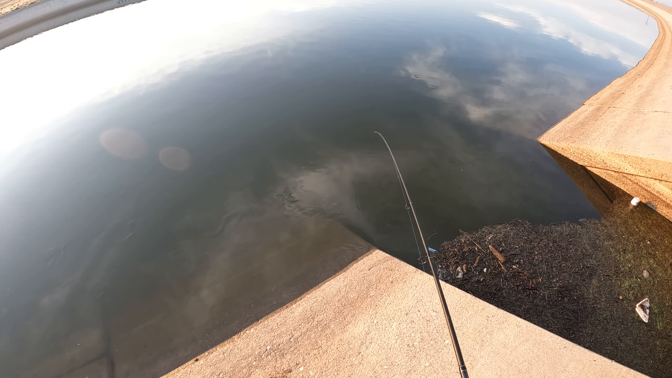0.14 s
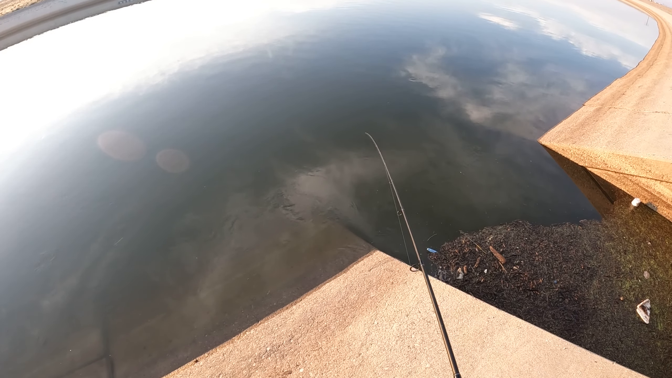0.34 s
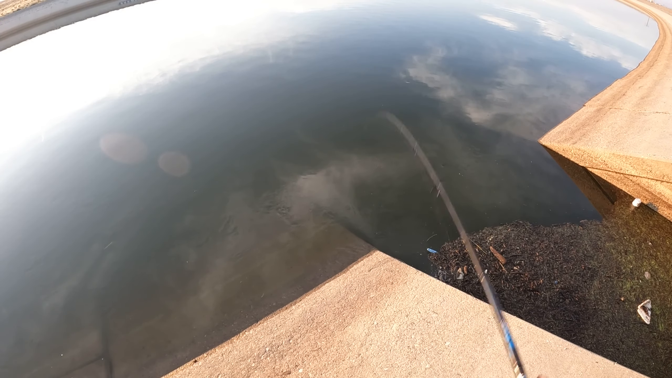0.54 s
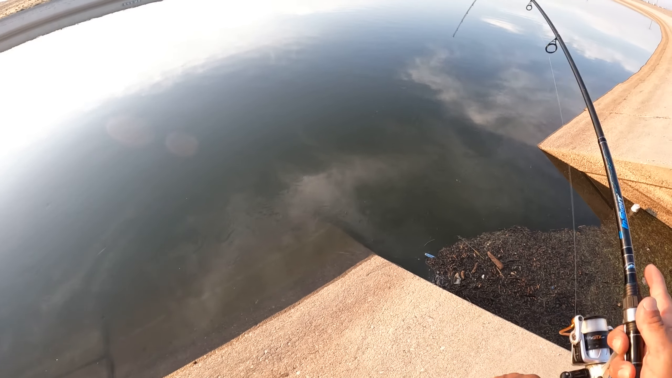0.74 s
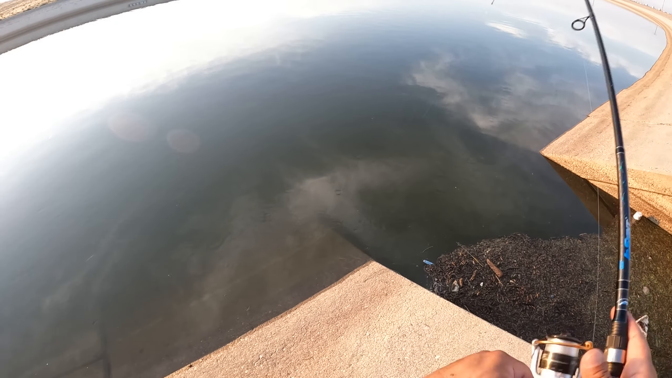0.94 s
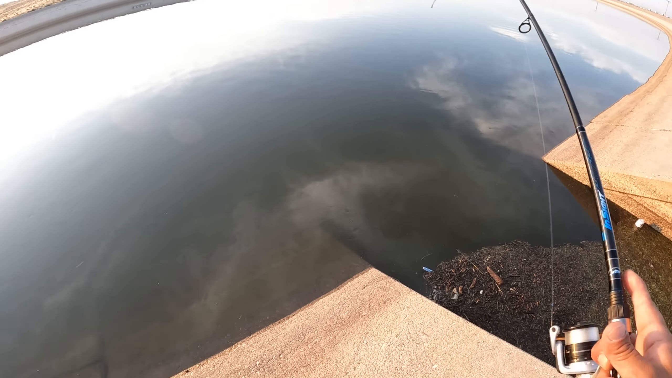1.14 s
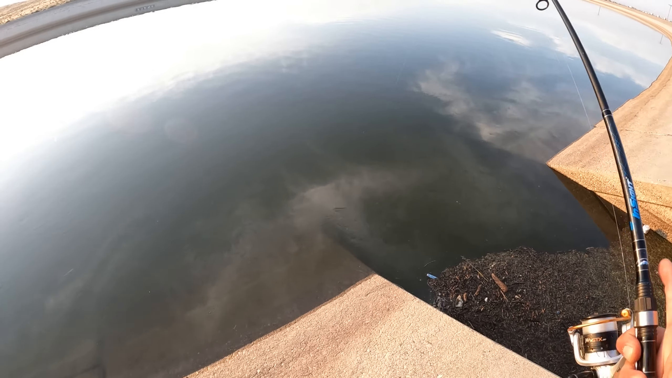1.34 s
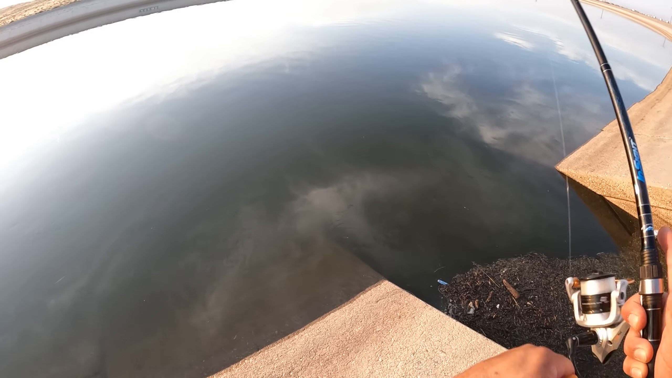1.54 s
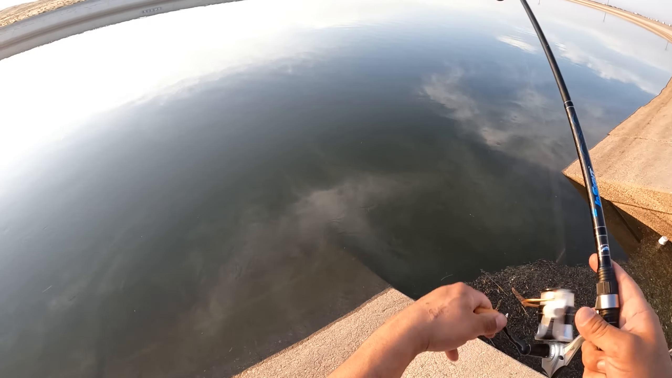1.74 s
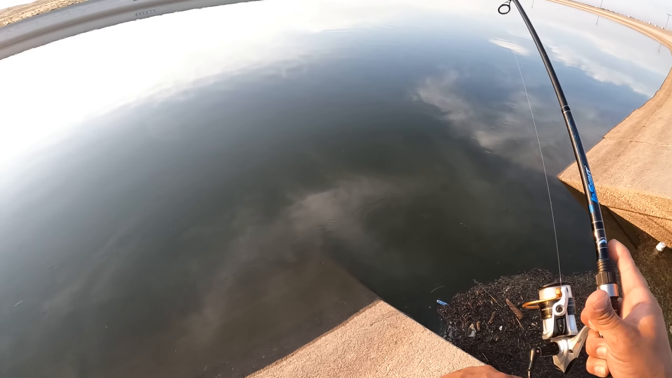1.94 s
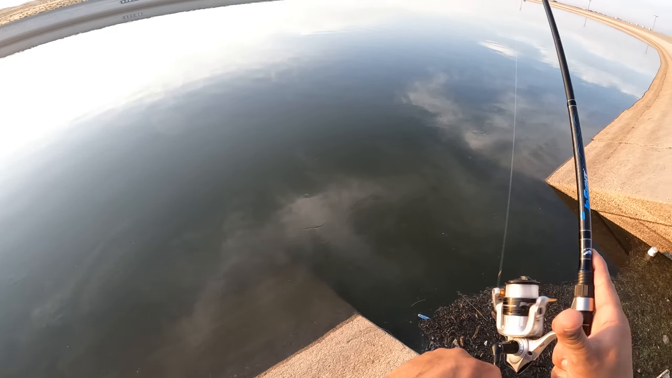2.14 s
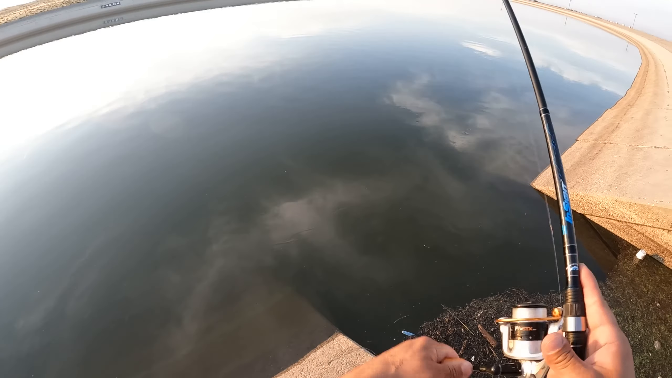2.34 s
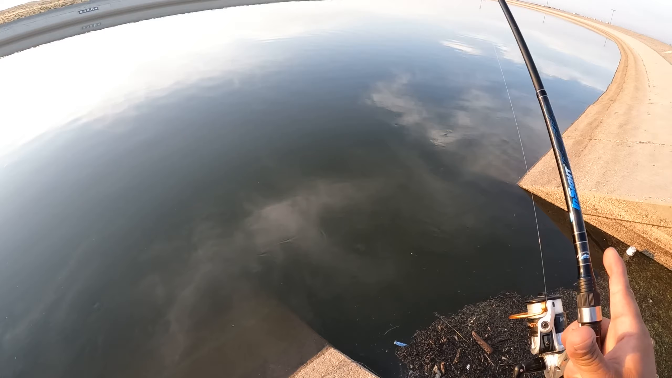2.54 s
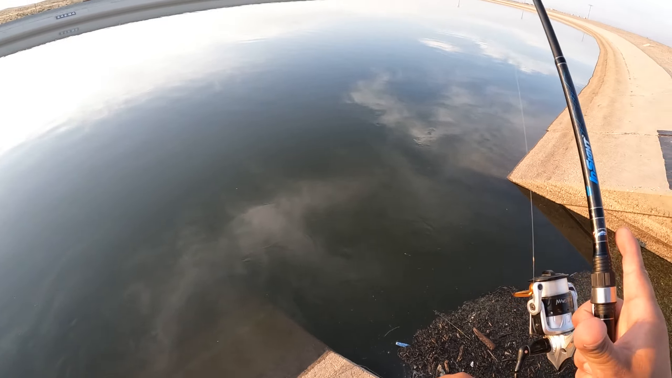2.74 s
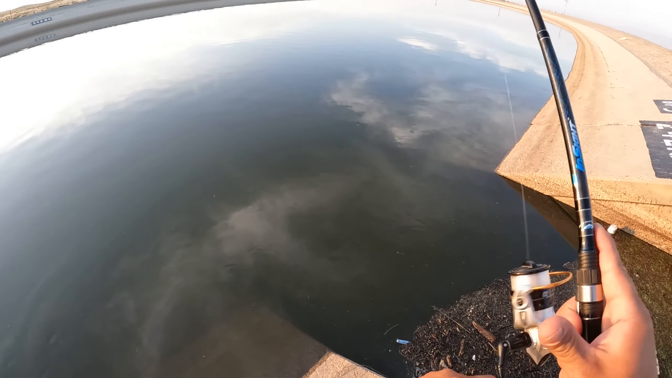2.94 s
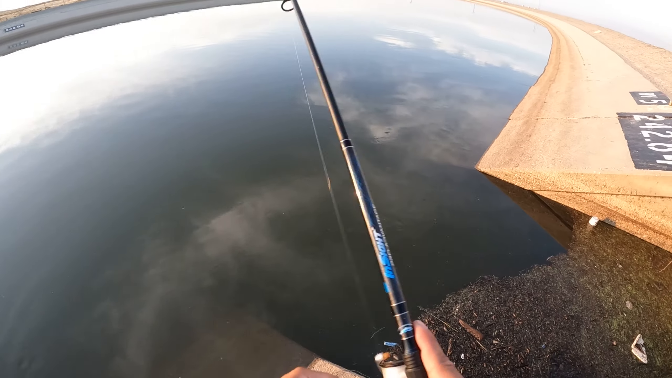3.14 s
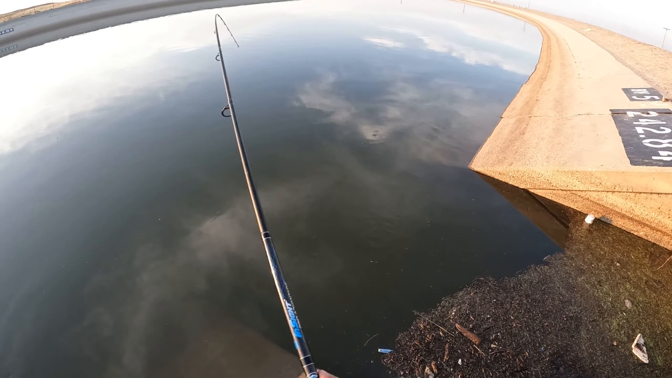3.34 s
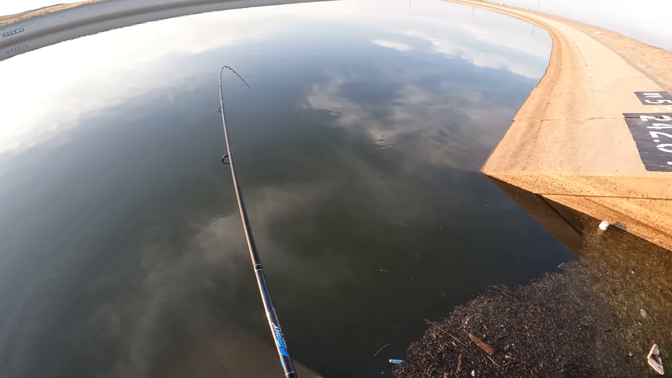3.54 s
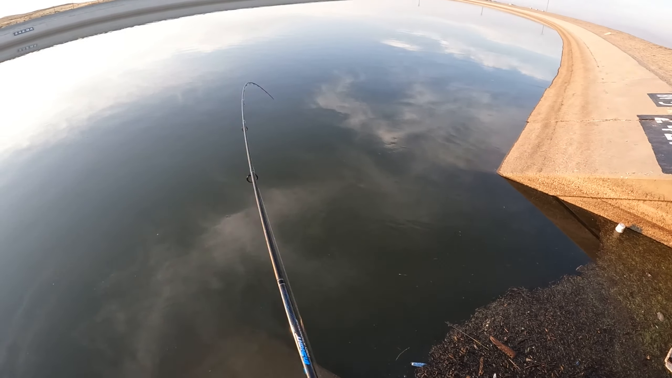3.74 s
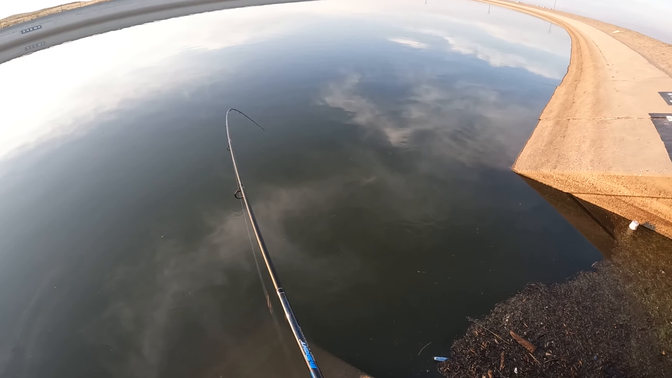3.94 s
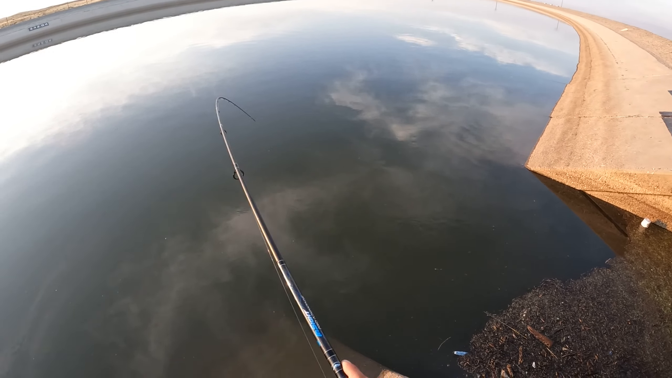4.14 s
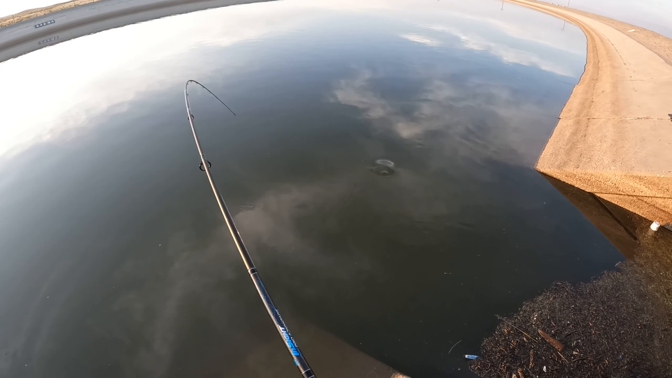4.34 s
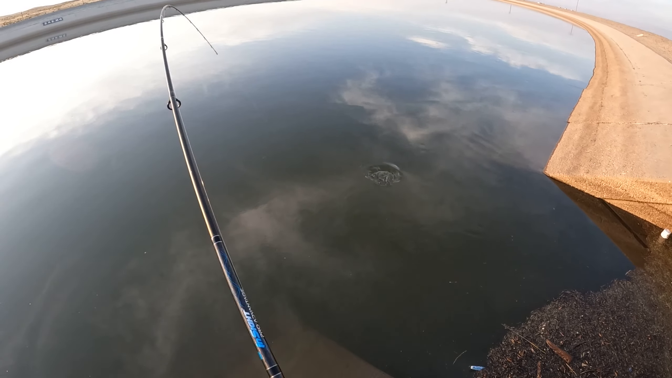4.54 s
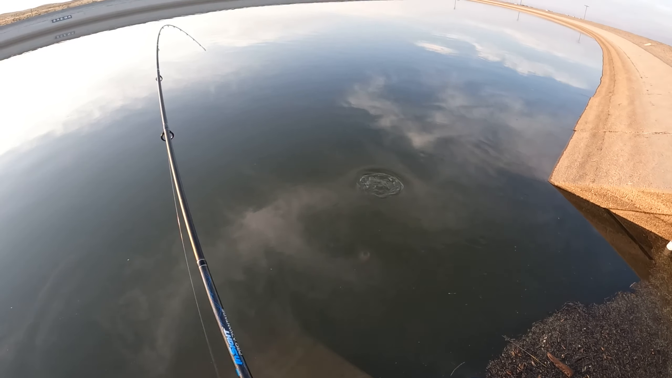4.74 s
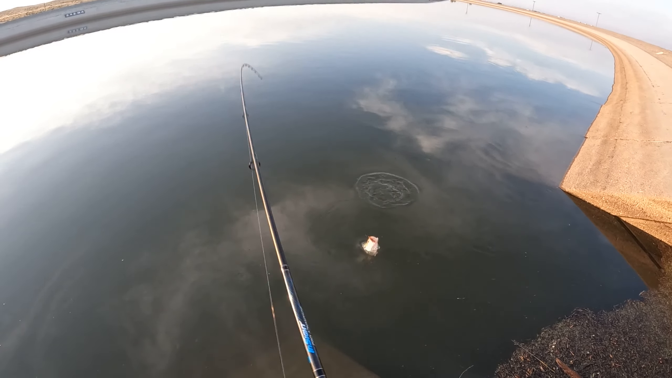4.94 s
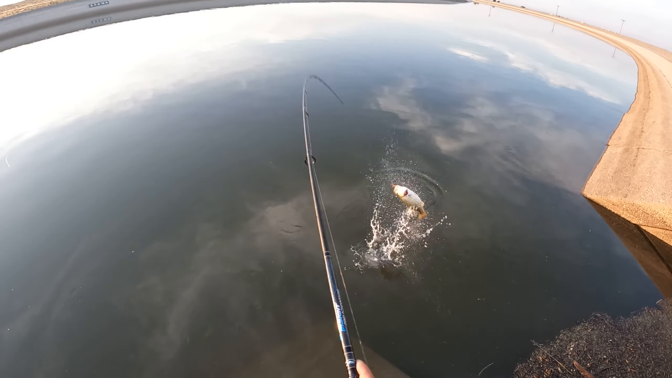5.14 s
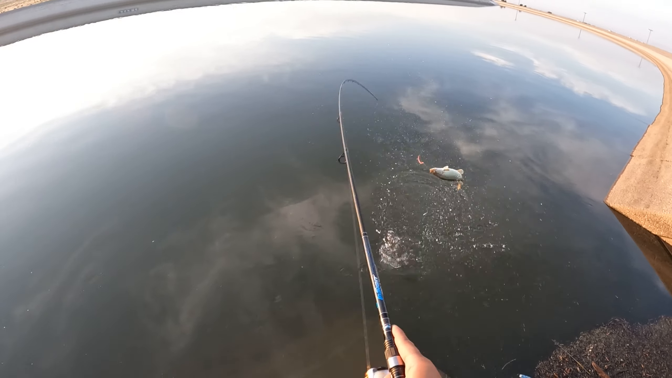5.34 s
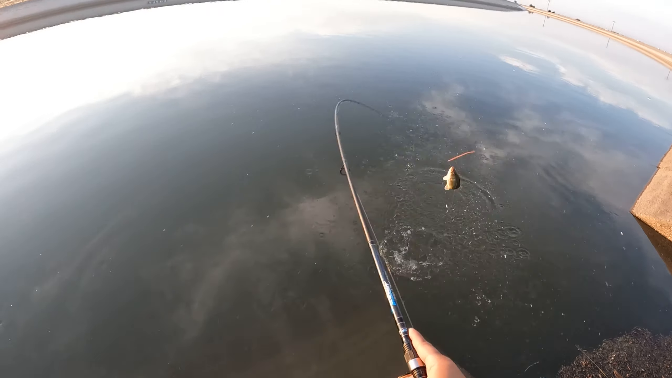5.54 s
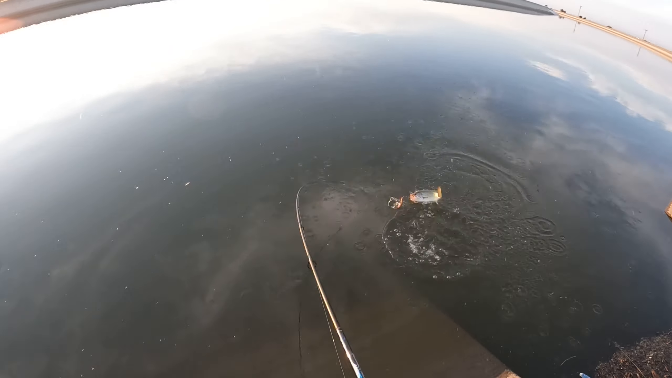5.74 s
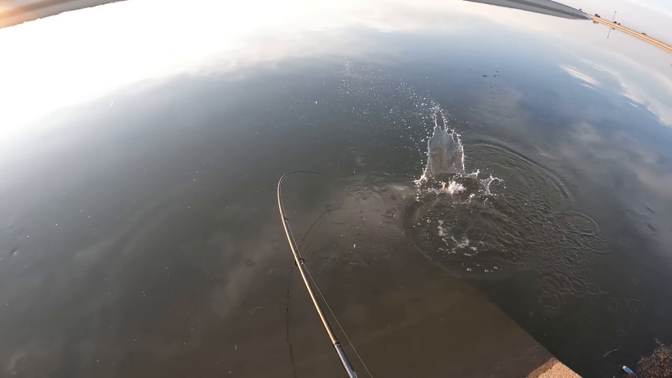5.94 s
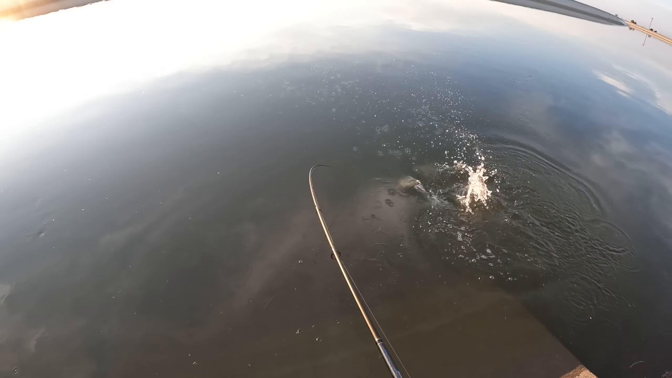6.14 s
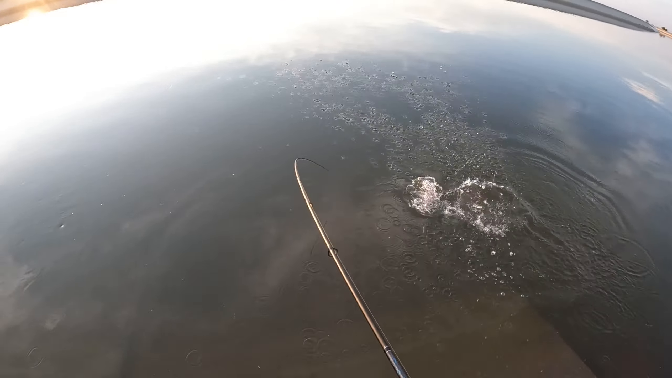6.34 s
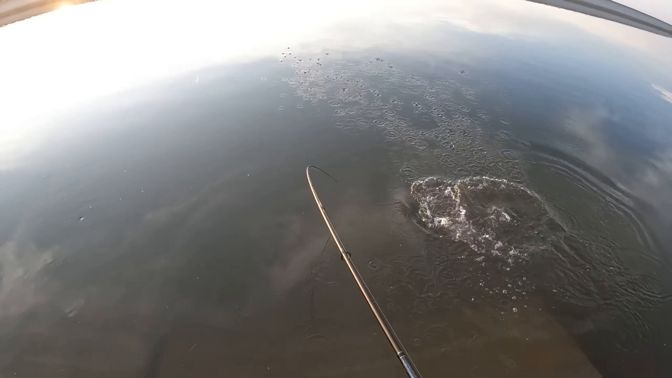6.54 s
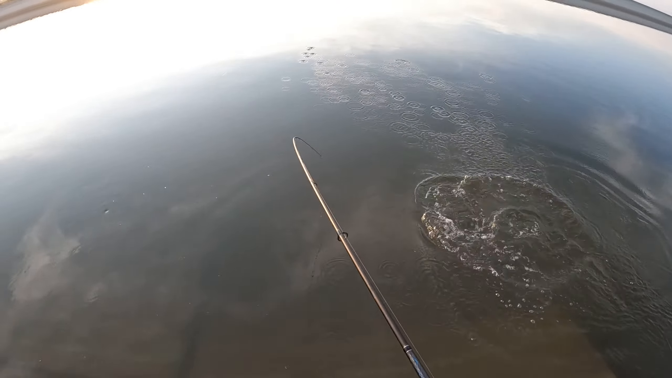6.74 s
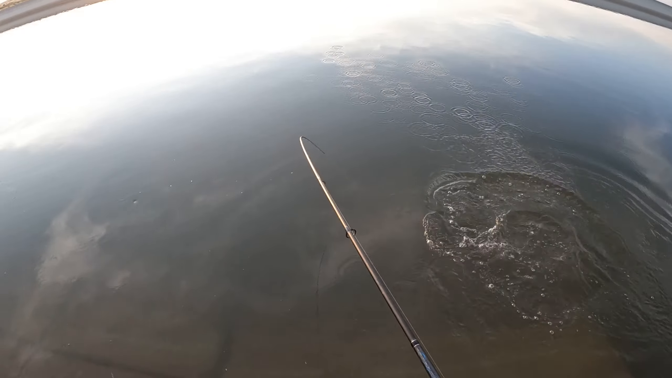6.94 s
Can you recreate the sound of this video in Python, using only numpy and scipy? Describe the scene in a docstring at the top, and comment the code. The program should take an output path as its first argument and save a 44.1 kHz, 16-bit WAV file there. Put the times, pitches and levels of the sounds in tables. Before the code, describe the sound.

Close reel clicking races and coasts in spurts over low wind rumble, followed by heavy watery thrashing, pattering spray and bubbling gulps.

```python
"""Wind rumbles on a body-worn microphone and sleeves rustle; then line rasps in the rod rings on a concrete bank.
A hooked fish pulls line in spurts: the reel's drag clicker ticks once per tooth as the spool speeds up and coasts.
Tackle clacks as modes ring, hands bump in soft noise bursts, and the taut line squeaks in gliding partials.
Then the fish leaps, falls back and thrashes: bubbles churn, spray patters, slaps burst, drops ring and air gulps."""
import sys
import numpy as np
from scipy import signal
from scipy.fft import rfft, irfft
from scipy.io import wavfile
from scipy.ndimage import uniform_filter1d, map_coordinates

SR = 44100
rng = np.random.default_rng(int(sys.argv[2]) if len(sys.argv) > 2 else 0)


def wav_out(sig):
    """Save sig, one row per channel (or a flat mono array), as 16-bit PCM at SR to the path in sys.argv[1]."""
    wavfile.write(sys.argv[1], SR, np.round(np.clip(np.atleast_2d(sig).T, -1, 1) * 32767).astype(np.int16))


N = 308259
T = np.arange(N) / SR  # seconds

# All table levels are relative: each source is balanced by its own function.
# Scatter around the microphone ports. Each row: frequency in Hz, level in dB.
SCATTER_COLOUR = [(100, -29), (500, -16.5), (1000, -12), (2000, -4), (4000, -4.5), (9000, -26),
                  (13000, -2.5)]
# Course of the wind on the microphone. Each row: time in seconds, level in dB.
WIND_LEVEL = [(0.0, -48.5), (0.47, -53), (0.72, -38), (0.99, -57.5), (1.13, -43), (1.38, -47.5),
              (1.75, -39.5), (2.12, -41), (2.45, -42), (2.51, -49), (2.9, -45), (4.63, -45.5), (4.71, -53),
              (5.35, -40), (5.65, -52), (5.68, -41.5), (6.97, -53.5), (6.99, -51)]
# Spectrum of the wind. Each row: frequency in Hz, level in dB.
WIND_COLOUR = [(15, -1), (28, -1), (42, -7), (58, -13), (85, -18), (120, -22), (180, -31)]
# Course of the dull low rustle: sleeves and grip, then water sloshing from 5.2 to 6.7 s. Each row: time in
# seconds, level in dB.
GRIP_LEVEL = [(0.0, -60.5), (1.79, -51), (2.8, -61.5), (3.21, -50.5), (5.0, -52.5), (5.3, -36), (5.88, -53),
              (6.07, -52), (6.35, -47), (6.99, -55)]
# Spectrum of that rustle. Each row: frequency in Hz, level in dB.
GRIP_COLOUR = [(60, -15.5), (120, -14), (220, 1.5), (320, 1), (480, -15.5), (900, -23.5)]
# Spectrum of the far hum of open country. Each row: frequency in Hz, level in dB.
AIR_COLOUR = [(100, -10.5), (200, 4), (330, -21.5), (500, -20.5), (800, -26.5), (1500, -23), (4000, -76),
              (10000, -39), (15000, -48)]
# Sweeps of the rod drag line through the rings.
# Each row: time of the height in seconds, level in dB, rise in seconds, fall in seconds.
ROD_SWEEPS = [(0.23, -52.5, 0.26, 0.28), (0.67, -39, .15, .4), (1.46, -51.5, 0.41, 0.18),
              (2.02, -38, 0.45, 0.17), (2.79, -47, 0.6, 0.42), (3.45, -37, 0.18, 0.53),
              (4.88, -41, 0.14, 1), (5.28, -33, 0.49, 0.26), (5.93, -49, .08, .4),
              (6.53, -33.5, 0.62, 0.35)]
# Spectrum of the line's rasp. Each row: frequency in Hz, level in dB.
LINE_COLOUR = [(700, -22.5), (1200, -7), (1600, 1), (2000, 6.5), (2350, 2.5), (2800, -7.5), (3500, -3),
               (4300, -11), (5200, -7.5), (7000, -15), (11000, -23), (15000, -40)]
# Hard clacks of rod and reel. Each row: start in seconds, strength in dB.
CLACKS = [(0.6024, -24.5), (0.6465, -18), (0.6497, -13), (0.9533, -29), (1.48, -28.5)]
# Ringing modes of a clack. Each row: frequency in Hz, level in dB, time to fall 60 dB in seconds.
CLACK_MODES = [(1250, -3, 0.0035), (1810, 2, 0.021), (1950, 4, 0.013), (2350, 5, 0.0085),
               (3110, -18, 0.044), (4500, 1.5, 0.0033)]
# Hands bump and rub the tackle. Each row: start in seconds, strength in dB.
HAND_BUMPS = [(0.648, -40.5), (1.528, -47), (1.768, -40.5), (2.052, -35.5), (2.08, -34.5), (2.218, -44.5),
              (2.944, -43), (3.331, -38), (4.04, -41.5), (4.457, -33), (4.54, -39), (4.994, -40),
              (5.434, -41), (5.674, -34), (5.894, -34.5), (5.959, -38)]
# Spectrum of a bump. Each row: frequency in Hz, level in dB.
BUMP_COLOUR = [(60, -11), (130, -2), (210, 1.5), (330, -9.5), (650, -15.5), (1200, -18.5), (3000, -19)]
# Each tug of the fish spins the spool up and lets it coast.
# Each row: time of top speed in seconds, top speed in ticks per second, spin-up in seconds,
# coast in seconds, tick strength in dB, buzz of the bent rod in dB, ring of the spool in dB.
TUGS = [(0.756, 125, .0415, .15, -37.5, -18, -4), (1.085, 270, 0.054, 0.069, -38.5, 0, -2.5),
        (1.214, 320, 0.063, 0.15, -37, -13, -6.5), (1.63, 128, 0.059, 0.089, -39.5, 0, -1.5),
        (1.787, 220, .075, 0.08, -38.5, -1, -1.5), (1.93, 240, 0.059, 0.065, -36.5, 12, -4.5),
        (2.305, 180, 0.082, .13, -39, -2, -1), (2.53, 260, .1, .075, -39, 4, -3.5),
        (3.12, 141, 0.11, 0.13, -37, -7, 2.5), (3.235, 176, 0.13, .1, -36, -12, -4),
        (3.335, 288, 0.1, .08, -36, 5, -7.5), (3.595, 235, 0.075, 0.19, -38.5, 8.5, -2.5),
        (3.82, 440, 0.084, 0.24, -40.5, 14.5, -2.5), (3.968, 393, .08, .08, -39.5, 12, -3.5),
        (4.12, 620, 0.074, .13, -39, 9.5, -5), (4.26, 178, .06, .055, -38, -3, -7.5),
        (4.44, 94, 0.13, 0.1, -38.5, 0, -3), (4.57, 181, 0.058, .115, -37, 3, -5.5),
        (5.269, 125, 0.12, 0.25, -46.5, -2, -1), (5.579, 430, .055, 0.18, -39, 13.5, -6.5),
        (5.998, 80, .04, 0.15, -47.5, -2, 2), (6.38, 400, 0.17, 0.21, -44.5, -3, -5),
        (6.7, 225, .11, 0.091, -44.5, 19, -0.5)]
# The spool slips by a single tooth. Each row: start in seconds, strength in dB.
SINGLE_TICKS = [(0.9328, -21.5), (1.0121, -22), (1.378, -26), (1.4815, -28.5), (1.5424, -28), (2.0173, -20),
                (2.0358, -22.5), (2.1458, -23), (2.2052, -25.5), (2.6105, -26.5), (2.7901, -28),
                (2.8564, -25.5), (2.9058, -25), (2.9711, -25.5), (3.441, -26.5), (3.493, -25.5),
                (4.778, -25.5), (4.91, -24), (4.978, -23), (5.0025, -23), (5.027, -21), (5.7952, -31.5),
                (5.818, -28), (5.858, -27), (6.8044, -30), (6.8448, -26.5)]
# The pawl bounces after each drop. Each row: nominal delay in seconds, share of the drop (signed).
PAWL_BOUNCES = [(.00025, -.9), (.0006, .5), (.0011, -.3)]
# Short, damped knock of the reel body. Each row: frequency in Hz, bandwidth in Hz, mean level in dB.
REEL_BODY = [(1150, 230, -7.5), (1790, 73, 3), (2920, 370, -2), (3543, 120, 5.5), (4234, 540, 2),
             (5200, 1290, 1.5), (6370, 2540, 2), (8000, 780, 3.5), (8530, 1230, -3), (10420, 390, -2),
             (11170, 320, -4), (13300, 2400, -13.5), (13900, 700, -28)]
# The metal spool rings on.
# Each row: nominal frequency in Hz, mean level in dB, time to fall 60 dB in seconds.
SPOOL_MODES = [(5253, 0.5, 0.1), (5353, 2, 0.04), (7450, -7, 0.15), (9800, -12, 0.059), (11050, -13, 0.14)]
# The taut line squeaks in the rings.
# Each row: start in seconds, length in seconds, first pitch in Hz, last pitch in Hz, level in dB.
SQUEAKS = [(1.697, 0.095, 1950, 2027, -41), (1.971, 0.099, 2295, 2050, -45), (2.05, 0.045, 2400, 3680, -58),
           (2.539, 0.1, 1950, 2130, -38), (2.60, 0.12, 2080, 1570, -45), (2.704, 0.13, 1600, 1655, -46.5),
           (2.74, 0.081, 2000, 2024, -42.5), (2.945, 0.047, 1680, 1544, -50)]
# Partials of a squeak. Each row: multiple of the pitch, level in dB.
SQUEAK_PARTIALS = [(1, 3.5), (2, -9), (3, -28)]
# The fish throws up water. Each row: time of the height in seconds, churn in dB, build-up in seconds,
# settling in seconds, spray at once in dB, spray falling back in dB.
SPLASHES = [(5.162, -25, 0.042, .16, -29.5, -30), (5.28, -38.5, 0.14, 0.34, -38, -37.5),
            (5.703, -32, 0.0068, 0.015, -42, -68), (5.875, -37, 0.0073, 0.055, -24.5, -38),
            (6.05, -23, 0.051, 0.076, -31, -36.5), (6.185, -34, 0.066, .1, -34, -54),
            (6.33, -23.5, 0.15, 0.27, -30, -32), (6.6, -35.5, 0.083, .16, -35.5, -62),
            (6.954, -48, 0.0073, 0.12, -56, -55)]
# Spectrum of the churning water. Each row: frequency in Hz, level in dB.
CHURN_COLOUR = [(150, -0.5), (230, 1), (330, 3), (550, 5), (780, -3), (1050, 9), (1400, -0.5),
                (2000, -24.5)]
# Spectrum of spray and of a drop's tick. Each row: frequency in Hz, level in dB.
SPRAY_COLOUR = [(900, -5), (1200, -4), (2200, -3.5), (3000, -8.5), (4500, -8), (7000, -14), (9000, -23),
                (12000, -21.5), (15000, -40)]
# Body and tail slap the surface. Each row: start in seconds, strength in dB, decay constant in seconds.
SLAPS = [(5.16, -3, 0.0072), (5.173, -12.5, 0.02), (5.343, -24, 0.0064), (5.699, -20.5, 0.0023),
         (5.873, -20.5, 0.017), (6.044, -6.5, 0.0086), (6.05, -10, 0.011), (6.295, -9.5, .01),
         (6.319, -13, .013), (6.337, -11, 0.014)]
# Spectrum of a slap. Each row: frequency in Hz, level in dB.
SLAP_COLOUR = [(150, -18), (330, -0.5), (700, 5), (1200, 9), (2000, -4), (4000, -13), (8000, -40),
               (15000, -54)]
# Single drops land and ring. Each row: start in seconds, strength in dB, starting pitch in Hz.
DROPS = [(5.265, -21.5, 1250), (5.289, -22, 1340), (5.339, -15.5, 2220), (5.383, -19, 1860),
         (5.303, -26, 2300), (5.4174, -24.5, 2640), (5.4636, -21, 1850), (5.9238, -19.5, 1760),
         (6.0728, -18, 1055), (6.0993, -22.5, 1730), (6.1559, -24.5, 995), (6.176, -23.5, 1220),
         (6.2347, -18, 1784), (6.383, -22, 1740), (6.455, -23, 1774), (6.4914, -23, 1850),
         (6.765, -28, 1860), (6.8257, -31, 1810), (6.951, -31, 1190)]
# Air pockets gulp. Each row: start in seconds, first pitch in Hz, pitch approached at the end in Hz,
# peak level in dB, time scale in seconds (the peak comes after a quarter of it).
GULPS = [(5.293, 326, 200, -42, 0.025), (5.626, 600, 278, -36.5, 0.0081), (5.699, 1150, 315, -28, 0.0137),
         (5.862, 450, 290, -27.5, 0.011), (5.92, 234, 321, -33, 0.13), (5.984, 950, 826, -29.5, 0.024),
         (6.024, 390, 524, -25.5, 0.017), (6.05, 360, 303, -15, 0.0067), (6.082, 250, 286, -36.5, 0.075),
         (6.271, 690, 580, -27, 0.018), (6.297, 296, 397, -29, 0.02)]

STALL_TICKS_PER_S = 58  # below this speed the drag holds the spool
HELD_BUZZ_DB, HELD_RING_DB = -15, -3.5  # rod buzz and spool ring while the spool is held


def from_db(db):
    """Turn decibels into an amplitude factor."""
    return 10 ** (np.asarray(db) / 20)


def rms_one(x):
    """Scale a sound to an rms of 1."""
    return x / np.sqrt(np.mean(x ** 2) + 1e-20)


def level_course(rows):
    """Join rows of (seconds, dB) by straight lines, at every sample."""
    seconds, db = np.transpose(rows)
    return np.interp(T, seconds, db)


def drift(rate):
    """Random wander with a spread of about 1, taking `rate` new values per second."""
    knots = rng.standard_normal(8000)
    return np.interp(T * rate, np.arange(len(knots)), knots) / np.sqrt(2 / 3)


def colour(x, points):
    """Causal (minimum-phase) filter with the given spectrum and unit power gain."""
    size = 4096
    hz, db = np.transpose(points)
    f = np.maximum(np.arange(size // 2 + 1) * SR / size, 5)
    # beyond the outer points the level falls 20 dB per octave
    octaves_outside = np.maximum(np.log2(hz[0] / f), 0) + np.maximum(np.log2(f / hz[-1]), 0)
    gain = from_db(np.interp(np.log(f), np.log(hz), db) - 20 * octaves_outside)
    # folding the cepstrum onto positive time gives the minimum phase
    cepstrum = irfft(np.log(gain))
    cepstrum[1:size // 2] *= 2
    cepstrum[size // 2 + 1:] = 0
    response = irfft(np.exp(rfft(cepstrum)))
    return signal.oaconvolve(x, response / np.linalg.norm(response))[:N]


def ring(clicks, hz, t60):
    """A unit click sets a damped sine of height 1 ringing; it falls 60 dB in t60 seconds."""
    radius, angle = from_db(-60 / (t60 * SR)), 2 * np.pi * hz / SR
    feedback = [1, -2 * radius * np.cos(angle), radius * radius]
    return signal.lfilter([0, np.sin(angle)], feedback, clicks + 1e-18)


def resonate(x, hz, width):
    """A resonance of the given width in Hz, with gain 1 on top."""
    radius = np.exp(-np.pi * width / SR)
    forward = np.array([1, 0, -1]) * (1 - radius * radius) / 2
    feedback = [1, -2 * radius * np.cos(2 * np.pi * hz / SR), radius * radius]
    return signal.lfilter(forward, feedback, x + 1e-18)


def fade(clicks, seconds):
    """Each click becomes an exponential fall from its own height."""
    return signal.lfilter([1], [1, -np.exp(-1 / (seconds * SR))], clicks + 1e-18)


def clicks_at(at, sizes):
    """Clicks of given sizes at given samples."""
    return np.bincount(np.clip(at, 0, N - 1).astype(int), sizes, N)


def strikes(rows):
    """Clicks from rows that begin with seconds and dB."""
    rows = np.array(rows)
    return clicks_at(rows[:, 0] * SR, from_db(rows[:, 1]))


def away(s, rise_s, fall_s):
    """Distance from an event's height: 0 at time s, 1 a rise before it and a fall after it."""
    return np.maximum((s - T) / rise_s, (T - s) / fall_s)


def swells(rows):
    """Joint level of events (s, dB, rise s, fall s); each climbs and sinks 20 dB in its rise and fall times."""
    power = 0
    for s, db, rise_s, fall_s in rows:
        distance = np.minimum(away(s, rise_s, fall_s), 10)
        power = power + from_db(db - 20 * distance) ** 2
    return np.sqrt(power)


def place(x, pan_db, width_db, lag):
    """Two ports: a lag in samples, a level step, and scatter off moving hands and ground that differs between them."""
    size, moves_per_s = 400, 7
    paths = rng.standard_normal((2, size)) * np.linspace(1, 0, size) ** 3
    first, second = (signal.oaconvolve(x, path / np.linalg.norm(path))[:N] for path in paths)
    # the scatter wanders between two random paths
    turn = 2 * drift(moves_per_s)
    scatter = np.cos(turn) * first + np.sin(turn) * second
    side = from_db(width_db) * colour(scatter, SCATTER_COLOUR)
    late = map_coordinates(x, [np.arange(N) - lag], order=3)
    left = (late + side) * from_db(pan_db / 2)
    right = (x - side) * from_db(-pan_db / 2)
    return np.array([left, right])


def surroundings(wind_db=0.5, wind_apart=0.39, grip_db=-4.5, lumpy_db=4.0, air_db=-60):
    """Wind turbulence, partly opposed between the ports, with a dull low rustle of grip and, later, sloshing
    water, and the far hum of open country."""
    shared = rms_one(colour(rng.standard_normal(N), WIND_COLOUR))
    apart = rms_one(colour(rng.standard_normal(N), WIND_COLOUR))
    ports = shared + wind_apart * apart * np.array([[1], [-1]])
    wind = from_db(level_course(WIND_LEVEL) + wind_db) * ports
    grip_level = level_course(GRIP_LEVEL) + grip_db + lumpy_db * drift(30)
    grip = from_db(grip_level) * colour(rng.standard_normal(N), GRIP_COLOUR)
    air = from_db(air_db) * colour(rng.standard_normal(N), AIR_COLOUR)
    # the wind is 2 dB stronger on the right port
    return wind * from_db([[-1], [1]]) + place(grip + air, pan_db=-1.0, width_db=4.5, lag=0.62)


def line(rate, level_db=-2.5):
    """The weave of the line rasps over the rings in fine, uneven grains, as the spool pays out and the rod sweeps."""
    grain_db, catch_db = 2.5, 1.8  # fine grain and slower catching
    # the rasp grows as a power of the spool's speed, evened out by the rod's flex
    rasp_db, reference_ticks_per_s, power, flex_s = -40, 195, 0.51, 0.054
    uneven = from_db(grain_db * drift(500) + catch_db * drift(35))
    rasp = colour(rng.standard_normal(N) * uneven, LINE_COLOUR)
    speed = np.abs(uniform_filter1d(rate, int(flex_s * SR))) / reference_ticks_per_s
    paying_out = from_db(rasp_db) * speed ** power
    return rms_one(rasp) * from_db(level_db) * np.hypot(paying_out, swells(ROD_SWEEPS))


def tackle(clack_db=-13.5, rattle=0.25, rattle_s=0.0026, bump_db=-0.5, bump_s=0.021):
    """Hard clacks set rod and reel modes ringing with a brief rattle; hand bumps are soft, fading noise."""
    hits = strikes(CLACKS)
    hits = hits + rattle * fade(hits, rattle_s) * rng.standard_normal(N)
    clacks = 0
    for k, (hz, db, t60) in enumerate(CLACK_MODES):
        clacks = clacks + (-1) ** k * from_db(db) * ring(hits, hz, t60)
    bumps = colour(fade(strikes(HAND_BUMPS), bump_s) * rng.standard_normal(N), BUMP_COLOUR)
    return from_db(clack_db) * clacks + from_db(bump_db) * bumps


def spool_motion():
    """A tug speeds the spool up evenly, then it coasts down; the fastest pull sets speed, ticks, buzz and ring."""
    rate, pull = np.zeros(N), np.zeros(N, int)
    for k, (s, top, rise_s, coast_s, *_) in enumerate(TUGS):
        far = np.minimum(away(s, rise_s, coast_s), 2)
        spin_up = top + (STALL_TICKS_PER_S - top) * far
        coast = top * (STALL_TICKS_PER_S / top) ** far
        speed = np.where(T < s, spin_up, coast)
        leads = speed > np.maximum(rate, STALL_TICKS_PER_S)
        rate, pull = np.where(leads, speed, rate), np.where(leads, k, pull)
    tick_db, buzz_db, ring_db = np.array(TUGS)[pull, 4:].T
    buzz_db = np.where(rate > 0, buzz_db, HELD_BUZZ_DB)
    ring_db = np.where(rate > 0, ring_db, HELD_RING_DB)
    return rate, tick_db, buzz_db, ring_db


def pawl(rate, tick_db, run_db=17.5, single_db=2.5, per_doubling_db=1.0):
    """The pawl drops as the spool breaks free, then once per tooth, harder with each doubling of speed."""
    jitter, uneven_db, swell_db = .008, 1.2, 1.0
    turned = np.cumsum(rate * (1 + jitter * drift(120))) / SR
    # teeth are counted afresh from each hold
    teeth = np.ceil(turned - np.maximum.accumulate(turned * (rate == 0)))
    at = np.flatnonzero(np.diff(teeth) > 0) + 1
    chance = uneven_db * rng.standard_normal(N) + swell_db * drift(25)
    speed_db = per_doubling_db * np.log2(rate[at] / np.median(rate[at]))
    running = clicks_at(at, from_db(tick_db[at] + run_db + speed_db + chance[at]))
    return running + from_db(single_db) * strikes(SINGLE_TICKS)


def spool_ring(drops):
    """Each pawl drop stops the old ring and starts a new one; mode strengths wander as the spool turns."""
    detune, vary_db, turn_db = .007, 3.0, 2.2
    at = np.flatnonzero(drops)
    struck = at[np.maximum(np.searchsorted(at, np.arange(N), "right") - 1, 0)]  # latest drop, per sample
    age = (np.arange(N) - struck) / SR
    out = 0
    for hz, db, t60 in SPOOL_MODES:
        pitch, strength = rng.standard_normal((2, N))[:, struck]
        variation = vary_db * strength + turn_db * drift(12)[struck]
        level = db + np.minimum(variation, 2 * turn_db)
        tone = np.sin(2 * np.pi * hz * (1 + detune * pitch) * age)
        out = out + from_db(level - 60 * np.abs(age) / t60) * tone
    return out * drops[struck] * (age >= 0)


def reel(rate, tick_db, buzz_db, ring_db, body_db=10.0, spool_db=-17.5, rod_db=-8.5):
    """The pawl slides off a tooth, knocks the body, bounces and scrapes up the next; rod and spool answer."""
    slide, slide_s, scrape, scrape_s, turn_db = .11, .0005, .018, .007, 1.7
    drops = pawl(rate, tick_db)
    at = np.flatnonzero(drops)
    # reversed time lets the slide grow towards each drop
    sliding = slide * fade(drops[::-1], slide_s)[::-1]
    scraping = scrape * fade(drops, scrape_s)
    force = drops + rng.standard_normal(N) * (sliding + scraping)
    # bounce timing changes little from tick to tick, so fast runs buzz with a pitch
    for delay, share in PAWL_BOUNCES:
        late = delay * from_db(2 * drift(35)[at])
        force = force + clicks_at(at + SR * late, share * drops[at])
    # the colour shifts as the spool turns
    body = 0
    for k, (hz, width, db) in enumerate(REEL_BODY):
        body = body + (-1) ** k * from_db(db + turn_db * drift(18)) * resonate(force, hz, width)
    rod = from_db(buzz_db + rod_db) * resonate(force, hz=3580, width=300)
    # parts this small radiate no bass
    knock = signal.sosfilt(signal.butter(3, 900, "high", fs=SR, output="sos"), body - rod)
    return from_db(body_db) * knock + from_db(spool_db) * spool_ring(drops * from_db(ring_db))


def squeal():
    """Under full strain the line sticks and slips: short, rough, gliding whistles with weak overtones."""
    waver, waver_rate, rough_rate = .036, 300, 200  # share of the pitch, changes per second
    wavering = 1 + waver * drift(waver_rate)
    partials = []
    for k, db in SQUEAK_PARTIALS:
        rough = drift(rough_rate) + 1j * drift(rough_rate)  # random level and phase
        partials.append((k, from_db(db) * rough))
    out = np.zeros(N)
    for s, length, first_hz, last_hz, db in SQUEAKS:
        at = np.flatnonzero((T >= s) & (T < s + length))
        done = (T[at] - s) / length
        hz = (first_hz + (last_hz - first_hz) * done) * wavering[at]
        phase = 2 * np.pi * np.cumsum(hz) / SR
        song = sum(np.real(rough[at] * np.exp(1j * k * phase)) for k, rough in partials)
        # each squeak swells and fades in one arch
        out[at] += from_db(db) * np.sin(np.pi * done) * song
    return out


def bubbles(per_s, low_hz, high_hz, cycles, spread_db, count=24):
    """Bubbles of random size and pitch, each falling 60 dB over the given cycles; rms 1."""
    sizes = from_db(spread_db * np.minimum(rng.exponential(1, N), 4)) * rng.choice([-1, 1], N)
    born = sizes * (rng.random(N) < per_s / SR)
    dealt = rng.integers(0, count, N)  # which pitch each bubble gets
    pitches = np.geomspace(low_hz, high_hz, count)
    # the weight hz makes high bubbles louder
    return rms_one(sum(hz * ring(born * (dealt == k), hz, cycles / hz) for k, hz in enumerate(pitches)))


def water(churn_db=-4.0, spray_db=-1.0):
    """Large bubbles where the fish churns, fine drops and foam where spray tears off and where it lands."""
    foam = .18
    flight_s, landing_rise_s, landing_fall_s = 0.11, 0.17, 0.37  # spray lands after its flight and patters out
    churning = swells([(s, db, rise_s, fall_s) for s, db, rise_s, fall_s, _, _ in SPLASHES])
    thrown = swells([(s, db, rise_s, fall_s) for s, _, rise_s, fall_s, db, _ in SPLASHES])
    landing = swells([(s + flight_s, db, landing_rise_s, landing_fall_s) for s, *_, db in SPLASHES])
    large = bubbles(per_s=450, low_hz=200, high_hz=1700, cycles=26, spread_db=3.0)
    fine = bubbles(per_s=1200, low_hz=1100, high_hz=13000, cycles=24, spread_db=3.8)
    churn = rms_one(colour(large + foam * rng.standard_normal(N), CHURN_COLOUR))
    spray = rms_one(colour(fine + foam * rng.standard_normal(N), SPRAY_COLOUR))
    return from_db(churn_db) * churning * churn + from_db(spray_db) * np.hypot(thrown, landing) * spray


def slaps(crack_db=7.0, burst_db=-13.0):
    """A slap is one pressure pulse with a short, fading burst of torn water."""
    burst = sum(fade(strikes([row]), row[2]) for row in SLAPS) * rng.standard_normal(N)
    return colour(from_db(crack_db) * strikes(SLAPS) + from_db(burst_db) * burst, SLAP_COLOUR)


def droplets(level_db=-1.0, tick_db=-8.0):
    """A drop ticks on the surface and leaves a small bubble that rises in pitch."""
    cycles, rise = 34, .1  # starting-pitch cycles to fall 60 dB, bend of the phase
    out = from_db(tick_db) * colour(strikes(DROPS), SPRAY_COLOUR)
    age = np.arange(SR // 16) / SR
    for s, db, hz in DROPS:
        spent = age * hz / cycles
        bubble = np.sin(2 * np.pi * hz * age * (1 + rise * spent))
        tone = from_db(db + level_db - 60 * spent) * bubble
        out = out + clicks_at(int(s * SR) + np.arange(len(tone)), tone)
    return out


def gulps():
    """A pocket of air rings, gliding in pitch as it changes shape."""
    out = np.zeros(N)
    for s, first_hz, last_hz, db, length in GULPS:
        age = np.arange(SR // 3) / SR / length
        hz = last_hz + (first_hz - last_hz) * np.exp(-2 * age)
        swell = 4 * age * np.exp(1 - 4 * age)
        tone = from_db(db) * swell * np.sin(2 * np.pi * np.cumsum(hz) / SR)
        out += clicks_at(int(s * SR) + np.arange(len(tone)), tone)
    return out


def scene():
    """Tackle near the microphone, the fish in the water, and the wind and country around them."""
    rate, tick_db, buzz_db, ring_db = spool_motion()
    rod = line(rate) + tackle() + reel(rate, tick_db, buzz_db, ring_db) + squeal()
    # the reel is held to the right, then lowered to the middle
    centred = np.clip((T - 3.2) / 0.24, 0, 1)
    to_the_right = place(rod, pan_db=-3.0, width_db=-10, lag=0.41)
    in_the_middle = place(rod, pan_db=0.0, width_db=-14, lag=0.47)
    near = (1 - centred) * to_the_right + centred * in_the_middle
    fish = place(water() + slaps() + droplets() + gulps(), pan_db=-0.8, width_db=-10.5, lag=0.48)
    return surroundings() + near + fish


def record(dry):
    """The left port is a little brighter than the right; a steep low-pass cuts the top."""
    tilt, cutoff_hz = .08, 15900
    ports = [np.convolve(x, [a, 1 - 2 * a, a], "same") for x, a in zip(dry, [-tilt, tilt])]
    return signal.sosfilt(signal.ellip(10, .1, 80, cutoff_hz, fs=SR, output="sos"), ports)


dry = scene()
out = record(dry)
wav_out(out)
```